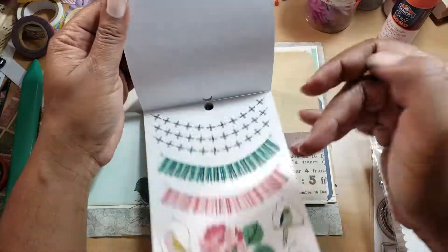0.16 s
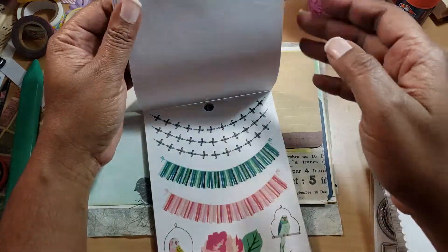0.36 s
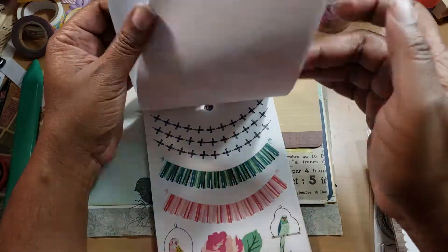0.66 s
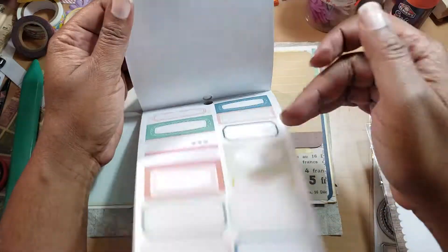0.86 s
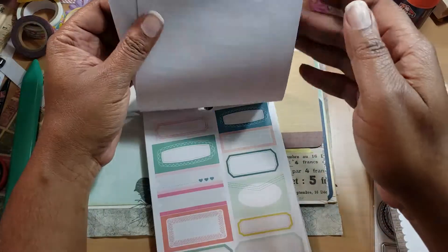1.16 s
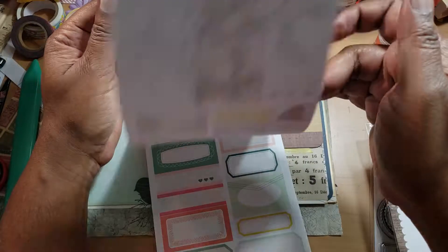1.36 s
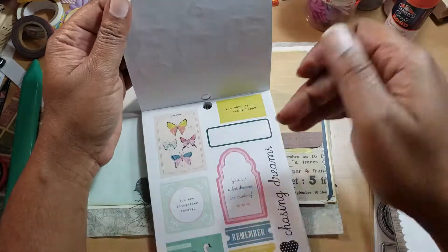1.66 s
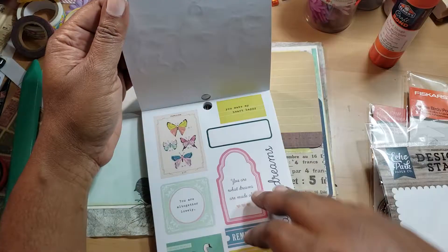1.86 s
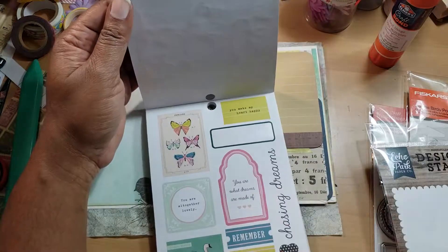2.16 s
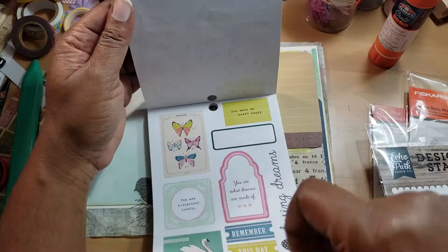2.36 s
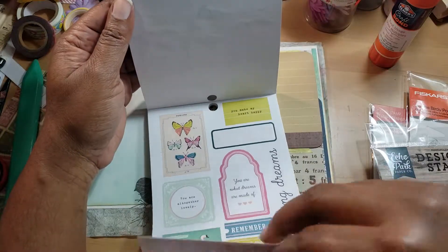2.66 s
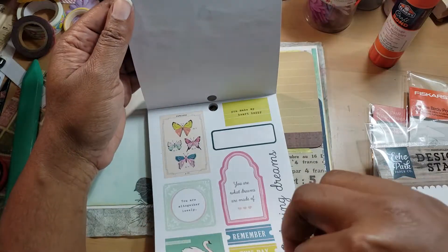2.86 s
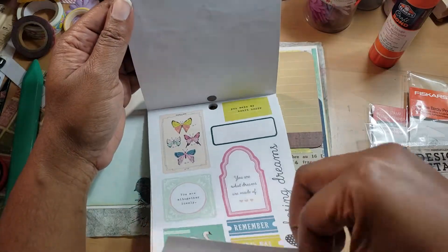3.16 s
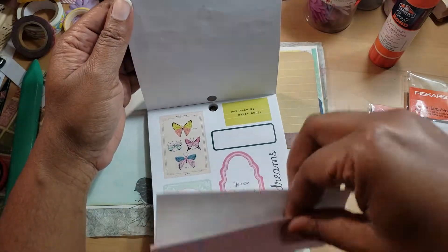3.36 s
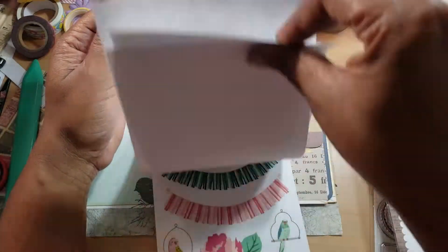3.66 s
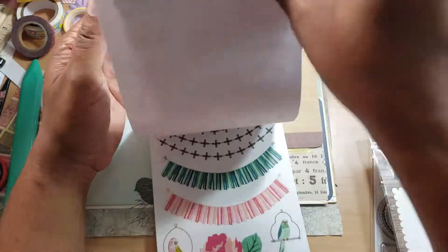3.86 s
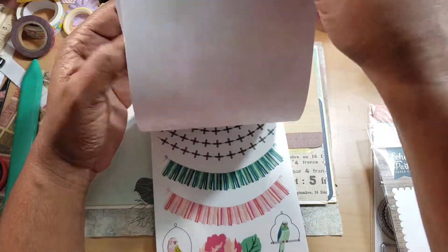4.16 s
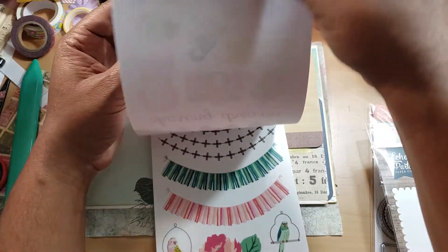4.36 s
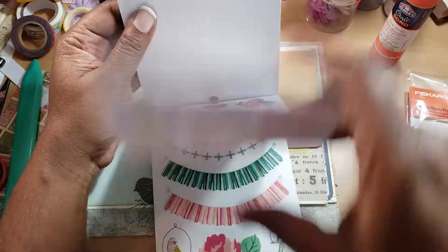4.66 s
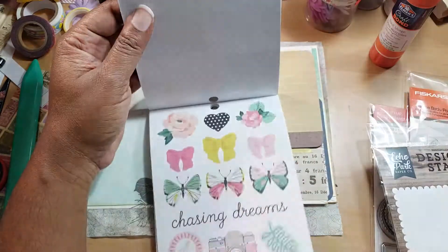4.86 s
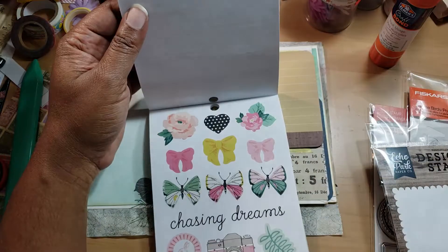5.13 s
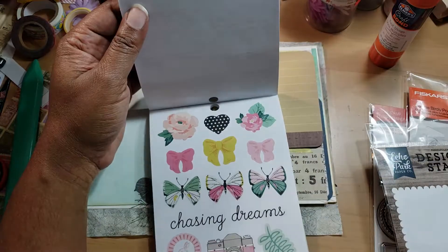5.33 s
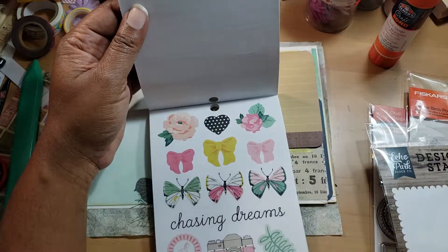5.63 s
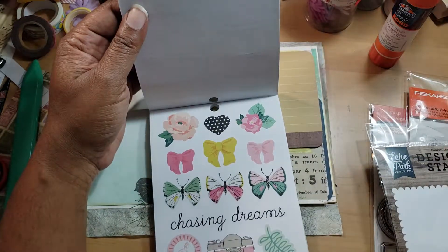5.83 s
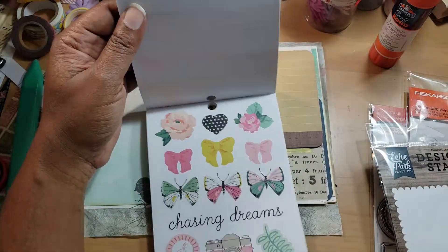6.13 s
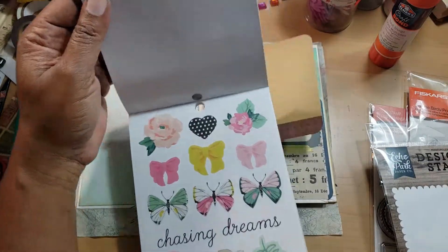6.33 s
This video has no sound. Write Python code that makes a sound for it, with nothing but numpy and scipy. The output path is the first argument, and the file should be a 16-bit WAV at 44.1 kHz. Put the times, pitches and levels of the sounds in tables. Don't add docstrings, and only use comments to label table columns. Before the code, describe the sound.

Close by at a desk, fingers riffle through a small pad of glossy sheets: breathy swishes, little corner snaps and soft pats. After a pause, a stronger peel squeaks and flicks loudly, another follows, then the page is lifted and dropped. The last second is nearly still, with low fan hum and faint hiss on the left.

```python
import sys
import numpy as np
from scipy import signal
from scipy.fft import rfft, irfft, next_fast_len
from scipy.io import wavfile
from scipy.ndimage import uniform_filter1d

SR = 44100
rng = np.random.default_rng(int(sys.argv[2]) if len(sys.argv) > 2 else 0)


def linear_from_db(decibels):
    return 10 ** (np.asarray(decibels, float) / 20)


def generate_wav(sig):
    pcm = np.round(np.clip(np.atleast_2d(sig).T, -1, 1) * 32767).astype(np.int16)
    wavfile.write(sys.argv[1], SR, pcm)


N = 286517
M = next_fast_len(N)
HZ = np.maximum(np.fft.rfftfreq(M, 1 / SR), 1)
LEFT_RIGHT = np.array([[1], [-1]])

# pitch_hz, level_db (rms)
FAN_TONES = [(56.83, -53.5), (59.31, -65), (113.65, -64), (119.97, -68)]
# frequency_hz, left_db_per_hz, right_db_per_hz
RUMBLE_SPECTRUM = [(27, -104, -104), (35.4, -85, -88), (46, -74, -82.5), (67.7, -76.5, -74),
                   (114.8, -76.5, -74.5), (153.7, -94, -90), (301, -99, -97), (402, -109, -110),
                   (1280, -112, -118), (4000, -120, -121), (9150, -129, -129), (10600, -126, -128),
                   (10800, -121, -121), (16000, -120, -120)]
# frequency_hz, likeness_0_to_1
RUMBLE_ALIKE = [(100, 1), (290, 0.5), (640, 0.18), (1500, .03)]
# frequency_hz, level_db_per_hz
AIR_SPECTRUM = [(900, -125), (1250, -110), (1700, -101), (2050, -96), (2400, -92), (2900, -94.5),
                (3350, -110), (4800, -119), (5600, -116), (6300, -110), (6800, -113), (7200, -124),
                (8200, -135)]
# frequency_hz, left_minus_right_db
PORT_COLOUR = [(300, -1.5), (650, .5), (1300, -.5), (2800, 4.5), (4500, -.8), (6500, -4.5), (8500, -9),
               (10500, -12.5), (12500, -12), (15500, -9.5)]
# frequency_hz, likeness_0_to_1
NEAR_ALIKE = [(500, 0.76), (1400, 0.81), (2800, .58), (4500, 0.27), (8000, .05)]
# start_s, left_late_samples
LEFT_DELAY = [
    (0, -2),
    (1.55, 1),
    (2.35, 2),
    (3.0, 1),
    (3.5, 0),
    (4.9, 2),
]
# start_s, peak_db, pitch_hz, t60_s
PAGE_PATS = [(0.047, -53.5, 203, 0.26), (0.086, -58.5, 328, 0.11), (0.307, -59, 325, 0.046),
             (1.142, -50.5, 253, 0.11), (1.599, -56, 215, 0.11), (1.634, -60, 212, 0.19),
             (2.604, -55.5, 195, 0.034), (2.894, -60, 342, 0.048), (3.032, -49, 270, 0.079),
             (4.118, -60, 260, 0.096), (4.17, -58, 284, 0.095), (4.689, -55, 248, 0.13),
             (4.7, -63, 350, 0.094), (4.743, -52, 208, 0.056), (4.832, -57, 202, 0.13),
             (4.939, -62, 233, 0.055), (4.988, -62.5, 218, 0.06), (6.48, -61, 254, 0.035)]
# start_s, peak_db, pitch_hz, t60_s
FINGER_TAPS = [(0.05, -59, 670, 0.045), (0.083, -56.5, 513, 0.036), (0.938, -59, 517, 0.067),
               (.953, -54, 700, 0.073), (1.142, -51.5, 730, 0.039), (1.249, -57.5, 676, 0.089),
               (1.596, -59, 536, 0.11), (1.634, -61, 560, 0.058), (2.604, -33, 1150, 0.035),
               (3.052, -39.5, 960, 0.036), (4.687, -65, 1250, 0.045), (4.702, -49.5, 1070, 0.037),
               (4.733, -49, 1050, 0.05), (4.745, -57, 900, 0.06), (4.797, -53, 1150, 0.022),
               (4.832, -49.5, 634, 0.085), (4.839, -57, 850, 0.012), (5.005, -68, 791, 0.036)]
# start_s, peak_db, ring_hz, crack_db
CORNER_SNAPS = [(0.075, -43.5, 2190, -7), (.443, -57, 2000, -15), (0.789, -38, 2680, -7),
                (1.689, -52.5, 2300, -26), (2.004, -80, 2570, -8), (2.869, -48, 1790, -15),
                (2.898, -42.5, 2400, -8), (3.815, -60, 2100, -6), (4.097, -41, 1900, -16),
                (4.457, -46, 2900, -7), (4.689, -55, 1600, -12), (4.735, -48, 1216, -14),
                (4.823, -53, 1900, -18), (2.458, -33, 3060, -15), (2.484, -34, 3000, -18),
                (2.757, -51, 1660, -11), (2.817, -54, 1770, -15), (3.02, -32, 3450, -9),
                (3.037, -34, 3300, -17), (3.051, -29, 2200, -16), (4.05, -50, 1940, -15),
                (4.106, -40, 1800, -15), (4.798, -63, 6000, 1), (4.834, -52, 2300, -8),
                (4.933, -57, 2820, -6)]
# start_s, peak_db, ring_hz, crack_db
MORE_SNAPS = [
    (1.044, -34, 2300, -7),
    (2.605, -28, 1980, -12.5),
    (2.647, -35, 1400, -24),
]
# start_s, length_s, from_hz, to_hz, level_db (rms)
SLIDING_SPANS = [(0.451, 0.098, 5190, 3600, -56.5), (0.694, 0.065, 3180, 4900, -51),
                 (0.957, 0.087, 2200, 1800, -58.5), (1.051, 0.14, 2294, 2100, -61),
                 (1.376, 0.049, 2490, 5100, -55.5), (2.385, .03, 4050, 3870, -55),
                 (2.41, 0.064, 3650, 3200, -49), (2.452, 0.1, 3157, 2953, -42.5),
                 (2.53, 0.072, 2890, 2740, -50), (2.381, 0.13, 6020, 4990, -51),
                 (2.398, 0.18, 1141, 1280, -61), (2.999, 0.041, 4720, 3450, -45),
                 (3.025, 0.049, 3465, 3160, -43.5), (3.553, 0.085, 5150, 4820, -49.5),
                 (3.61, 0.062, 4730, 4450, -56), (3.563, 0.14, 1996, 1450, -55),
                 (3.07, 0.078, 1850, 1600, -55), (3.82, 0.11, 2100, 2570, -65),
                 (4.045, 0.04, 2025, 1780, -58), (4.092, 0.041, 1780, 1800, -45.5),
                 (4.13, .13, 1897, 2080, -49.5), (4.27, .065, 1850, 1900, -56),
                 (4.334, 0.084, 2100, 2250, -57), (4.822, 0.021, 2340, 1880, -59),
                 (4.931, .075, 1850, 2700, -62), (5.046, 0.2, 2585, 2913, -65.5),
                 (6.216, 0.082, 3940, 3430, -74)]
# start_s, length_s, pitch_hz, width_hz, level_db (rms)
HELD_SPANS = [(0.448, .35, 1480, 149, -64.5), (1.079, 0.316, 1480, 120, -60.5),
              (2.37, 0.085, 1950, 430, -50), (2.455, 0.084, 1880, 320, -46.5),
              (2.53, 0.074, 1800, 350, -51), (2.44, 0.12, 5050, 350, -54), (3.2, .05, 2250, 400, -58),
              (3.025, .05, 1150, 350, -50), (2.663, 0.036, 5600, 250, -62), (2.92, 0.098, 1927, 200, -60),
              (3.02, 0.056, 1890, 340, -43.5), (3.195, 0.056, 5040, 300, -55), (3.535, .03, 1000, 300, -67),
              (2.15, 0.152, 1300, 700, -78), (4.46, .1, 1200, 600, -72.5), (3.255, 0.12, 2980, 380, -60),
              (4.099, 0.097, 3420, 250, -50.5), (4.179, 0.062, 4120, 300, -52.5),
              (4.742, .06, 1990, 300, -67), (5.36, 0.067, 2530, 570, -62.5),
              (4.731, 0.095, 4700, 1500, -72), (4.99, 0.055, 3800, 700, -63), (5.04, 0.067, 4100, 900, -69),
              (4.29, .11, 3350, 500, -55), (4.19, .06, 4700, 300, -59), (5.09, .165, 3800, 900, -67),
              (3.005, 0.076, 5900, 1100, -46), (3.545, 0.145, 1053, 240, -59.5),
              (0.999, .2, 2290, 400, -64)]
ZONE_EDGES = [300, 1250, 3400, 7500, 17500]
# pitch_hz, width_hz, level_db (over the broad noise)
SHEET_MODES = [
    [(725, 250, 9), (1460, 240, 11.5), (2280, 760, 15.5), (3600, 7000, 8), (13150, 4100, 13)],
    [(970, 400, 7), (1800, 620, 8), (3070, 870, -9), (4900, 5100, 3.5), (12830, 3600, 7)],
    [(950, 68, 3), (2020, 370, 4), (3220, 2600, -7.5), (4900, 2300, 1), (12500, 2800, 5.5)],
    [(900, 500, -7), (2100, 730, 12), (2720, 440, 6), (3920, 330, -10), (13600, 3600, 14.5)],
    [(1000, 400, -10), (1600, 400, -7), (3100, 2100, 1), (4500, 1600, 1), (12700, 2400, 12)],
]
SHEET_PAN = [0.34, 0.34, 1.5, 4.1, 3.8]
# lowest_hz, treble_shadow (multiple of the port colouring)
SHEET_REACH = [(470, 1.39), (650, 1.05), (840, 1.17), (500, 1.6), (700, 1.8)]
# boom_db, scrape_db
SHEET_WEIGHT = [(-18, 1), (-15.5, -0.5), (-20.5, -0.5), (-7, 2), (-4, 4)]
# peak_s, rise_s, fall_s, body_db, skin_hiss_db (over body)
RIFFLE_STROKES = [(0.005, 0.07, 0.095, -55, 9), (0.08, 0.032, 0.13, -65.5, 9), (0.18, .03, 0.1, -77, 2.5),
                  (0.27, .1, 0.24, -88.5, 6), (0.48, 0.074, 0.14, -59, -4.5),
                  (0.6, 0.25, 0.42, -59.5, -7.5), (0.725, .11, 0.13, -57.5, 9),
                  (0.8, 0.066, 0.18, -70.5, 4), (0.99, 0.037, .1, -64.5, -23),
                  (1.047, 0.013, 0.1, -53.5, -18), (1.15, 0.16, 0.16, -54.5, -6),
                  (1.27, 0.062, 0.18, -58.5, -5), (1.365, 0.066, 0.087, -59.5, 11),
                  (1.42, 0.053, 0.1, -67, 10.5), (1.49, 0.069, 0.12, -76.5, 7)]
PEEL_STROKES = [(2.01, 0.012, 0.18, -82, 11), (2.14, 0.11, 0.13, -87, 25), (2.225, 0.16, 0.076, -92, 30.5),
                (2.31, 0.018, 0.3, -76.5, 12.5), (2.4, 0.066, 0.21, -55, -1.5),
                (2.5, 0.13, 0.23, -46.5, -9), (2.585, .12, 0.06, -49.5, -14), (2.68, 0.059, 0.13, -51, -15),
                (2.78, 0.092, 0.093, -60, -9), (2.89, 0.16, 0.19, -61.5, -8.5), (3.022, .03, .09, -50, -7),
                (3.052, 0.052, 0.13, -46.5, -8), (3.125, 0.17, 0.11, -50.5, -8.5),
                (3.22, 0.074, 0.1, -53.5, -6), (3.3, 0.15, 0.24, -61.5, -4),
                (3.44, 0.2, 0.045, -64.5, -1.5)]
LIFT_STROKES = [(3.565, 0.032, .06, -61, -1), (3.6, 0.057, 0.15, -52, 0), (3.675, 0.16, 0.039, -52.5, -3.5),
                (3.71, 0.033, .05, -65, -9), (3.75, 0.032, 0.074, -63, -6), (3.82, 0.013, 0.098, -60, -8.5),
                (3.86, 0.058, 0.2, -64, -8.5), (4.0, 0.13, 0.12, -66.5, -10), (4.06, 0.062, 0.16, -63.5, 2),
                (4.112, 0.038, 0.14, -48, -4.5), (4.16, .08, .12, -51.5, -11.5),
                (4.211, 0.052, 0.22, -49.5, -14), (4.3, 0.061, 0.15, -51.5, -12.5),
                (4.345, 0.11, 0.11, -53, -12.5), (4.39, 0.089, 0.07, -53.5, -9),
                (4.42, 0.091, 0.057, -58.5, 1), (4.46, 0.024, 0.049, -66.5, 6),
                (4.51, 0.12, 0.14, -68.5, 0)]
DROP_STROKES = [
    (4.693, .01, .08, -77.5, 3),
    (4.745, 0.039, 0.1, -61, -6),
    (4.79, 0.057, .04, -70, -1),
    (4.84, 0.028, 0.15, -73, 5.5),
    (4.96, 0.063, 0.098, -73.5, 5.5),
    (5.01, .06, 0.11, -65.5, -5.5),
    (5.11, 0.092, 0.22, -73.5, 9.5),
    (5.19, 0.1, 0.14, -78, 3),
    (5.345, 0.065, 0.08, -73, -9),
    (5.4, 0.027, 0.071, -71, -2),
]
SHIFT_STROKES = [
    (6.24, 0.041, 0.17, -69, 0),
    (6.49, 0.045, .05, -79, -10),
]
STROKES = [RIFFLE_STROKES, PEEL_STROKES, LIFT_STROKES, DROP_STROKES, SHIFT_STROKES]


def rms_one(x):
    return x / np.sqrt(np.mean(x ** 2) + 1e-20)


def at_hz(points, column=1):
    points = np.array(points)
    return np.interp(np.log(HZ), np.log(points[:, 0]), points[:, column])


def drift(rate_hz):
    r = np.exp(-2 * np.pi * rate_hz / SR)
    return rms_one(signal.lfilter([1], [1, -2 * r, r * r], rng.standard_normal(N + 9000))[9000:])


def pair(common, own, likeness):
    alike = np.clip(at_hz(likeness), 0, 1)
    shared = np.sqrt(1 + alike) * rfft(common, M)
    opposed = np.sqrt(1 - alike) * rfft(own, M) * LEFT_RIGHT
    return (shared + opposed) / np.sqrt(2)


def port_gains(shadow=1):
    return linear_from_db(shadow * at_hz(PORT_COLOUR) / 2 * LEFT_RIGHT)


def band(x, hz, spread):
    edges = [hz / spread, min(hz * spread, 0.45 * SR)]
    x = signal.sosfilt(signal.butter(2, edges, "band", fs=SR, output="sos"), x)
    return x / np.abs(x).max()


def burst(noise, hz, spread, t60, rise):
    t = np.arange(len(noise)) / SR
    envelope = linear_from_db(-60 * t / max(t60, 0.003)) * (1 - np.exp(-t / rise))
    return band(noise * envelope, hz, spread)


def room():
    t = np.arange(N) / SR
    swell_s = 0.247
    tones = sum(np.sqrt(2) * linear_from_db(db) * np.sin(2 * np.pi * hz * (t - swell_s)) for hz, db in FAN_TONES)
    levels = linear_from_db([at_hz(RUMBLE_SPECTRUM, column=1), at_hz(RUMBLE_SPECTRUM, column=2)])
    rumble = irfft(pair(*rng.standard_normal((2, N)), RUMBLE_ALIKE) * levels, M)[:, :N]
    air = irfft(rfft(rng.standard_normal(M)) * linear_from_db(at_hz(AIR_SPECTRUM)), M)[:N]
    air = air * linear_from_db(0.9 * drift(6))
    per_hz = np.sqrt(SR / 2)
    return tones * linear_from_db([[-0.3], [0.3]]) + per_hz * (rumble + air * linear_from_db([[0], [-40]]))


def pats(rows, spread, rise):
    out = np.zeros(N + 6000)
    for (s, db, hz, t60), noise in zip(rows, rng.standard_normal((len(rows), 6000))):
        start = int(s * SR)
        out[start:start + 6000] += linear_from_db(db) * burst(noise, hz, spread, t60, rise)
    return out[:N]


def snaps(rows):
    out, t = np.zeros(N + 4000), np.arange(4000) / SR
    for (s, db, hz, crack_db), noise in zip(rows, rng.standard_normal((len(rows), 3, 4000))):
        ring = band(noise[0] * (t < 4 / hz), 0.85 * hz, 1.55)
        wash = linear_from_db(-35) * burst(noise[1], hz, 3.5, t60=0.17, rise=0.0056)
        crack = linear_from_db(crack_db + 2.5) * burst(noise[2], 8300, 4.3, t60=0.038, rise=0.00017)
        start = int(s * SR)
        out[start:start + 4000] += linear_from_db(db) * (ring + wash + crack)
    return out[:N]


def hits():
    corners = snaps(CORNER_SNAPS) + snaps(MORE_SNAPS)
    contacts = pats(PAGE_PATS, spread=1.47, rise=0.0021) + pats(FINGER_TAPS, spread=1.47, rise=0.0043)
    return irfft(rfft(corners + contacts, M) * port_gains(), M)[:, :N]


def whistles():
    rows = []
    for s, length, from_hz, to_hz, db in SLIDING_SPANS:
        width_hz = 160 + 0.053 * (from_hz + to_hz) / 2
        width_hz += 0.35 * abs(from_hz - to_hz)
        rows.append((s, length, from_hz, to_hz, width_hz, db))
    sag = 0.0451
    for s, length, hz, width_hz, db in HELD_SPANS:
        rows.append((s, length, hz, hz * (1 - sag), width_hz, db))
    return rows


def glides():
    out, rows = np.zeros((2, N)), whistles()
    steadiness = 0.7
    for row, noise in zip(rows, rng.standard_normal((len(rows), 4, 17000))):
        s, length, from_hz, to_hz, width_hz, db = row
        u = np.arange(int(length * SR)) / (length * SR)
        slow = signal.sosfilt(signal.butter(2, width_hz / 2, fs=SR, output="sos"), noise)
        slow = slow[:, 500:500 + len(u)] / np.sqrt(width_hz / SR)
        power = uniform_filter1d(slow[0] ** 2 + slow[2] ** 2, size=700)
        swell = np.sqrt(power / np.mean(slow[::2] ** 2) / 2)
        slow = slow / (swell + 0.06) ** steadiness
        phase = 2 * np.pi * np.cumsum(from_hz * (to_hz / from_hz) ** u) / SR
        sound = slow[:2] * np.cos(phase) + slow[2:] * np.sin(phase)
        start = int(s * SR)
        out[:, start:start + len(u)] += linear_from_db(db) * np.sin(np.pi * u) ** 0.32 * sound
    return irfft(pair(*out, NEAR_ALIKE) * port_gains(), M)[:, :N]


def patches(x, depth_db):
    _, _, z = signal.stft(x, nperseg=256)
    field = rng.standard_normal(z.shape[1:])
    field = uniform_filter1d(field, size=4, axis=0)
    field = uniform_filter1d(field, size=12, axis=1)
    return signal.istft(z * linear_from_db(depth_db * rms_one(field)), nperseg=256)[1][:, :N]


def friction():
    grain = linear_from_db(1.0 * drift(900) + 0.8 * drift(130) + 0.6 * drift(19.3))
    common, own = patches(rng.standard_normal((2, N)) * grain, depth_db=1.6)
    return pair(common, own, NEAR_ALIKE)


def sheet_zones(rubbing, modes, lowest_hz, shadow):
    peaks = sum(linear_from_db(2 * db) / (1 + (2 * (HZ - hz) / width) ** 4) for hz, width, db in modes)
    treble_lift = 1 + (HZ / 14300) ** 9
    power = HZ ** -0.4 * (1 + peaks) * treble_lift / (1 + (lowest_hz / HZ) ** 12)
    zones = []
    for low, high in zip(ZONE_EDGES, ZONE_EDGES[1:]):
        cut = power / (1 + (low / HZ) ** 12) / (1 + (HZ / high) ** 12)
        zone = irfft(rubbing * port_gains(shadow) * np.sqrt(cut), M)
        zones.append(zone / np.sqrt(np.mean(zone.mean(axis=0) ** 2)))
    return zones


def stroke(t, rise, fall):
    return -30.0 * np.where(t < 0, (np.abs(t) / rise) ** 1.91, (np.abs(t) / fall) ** 1.58)


def slides():
    out, t, rubbing = np.zeros((2, N)), np.arange(N) / SR, friction()
    sheets = zip(STROKES, SHEET_MODES, SHEET_REACH, SHEET_WEIGHT, SHEET_PAN)
    for rows, modes, (lowest_hz, shadow), (boom_db, scrape_db), pan_db in sheets:
        power = np.zeros((4, N))
        for s, rise, fall, db, skin_db in rows:
            span = slice(max(int((s - 2 * rise) * SR), 0), int((s + 2 * fall) * SR))
            heft_db = boom_db - 0.13 * skin_db + 0.48 * (db + 54.5)
            tilt_db = [[heft_db], [0], [scrape_db + 0.46 * skin_db], [skin_db]]
            power[:, span] += linear_from_db(2 * (db + stroke(t[span] - s, rise, fall) + tilt_db))
        power[0] = np.interp(t - 0.0087, t, power[0])
        zones = sheet_zones(rubbing, modes, lowest_hz, shadow)
        swish = sum(zone[:, :N] * np.sqrt(p) for zone, p in zip(zones, power))
        out += swish * linear_from_db(pan_db / 2 * LEFT_RIGHT)
    return out


def scene():
    left, right = slides() + glides() + hits()
    starts, late = np.transpose(LEFT_DELAY)
    now = np.searchsorted(starts, np.arange(N) / SR, side="right") - 1
    heard = np.arange(N) - late[now].astype(int)
    return np.array([left[np.clip(heard, 0, N - 1)], right]) + room()


def roll_off(x):
    return signal.sosfilt(signal.butter(12, 16950, fs=SR, output="sos"), x)


def record(dry):
    mix = irfft(rfft(dry, M) * (HZ < 15830), M)[:, :N]
    return roll_off(mix)


dry = scene()
out = record(dry)
generate_wav(out)
```